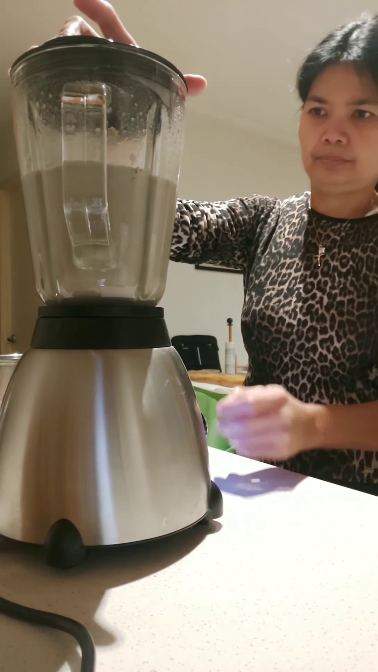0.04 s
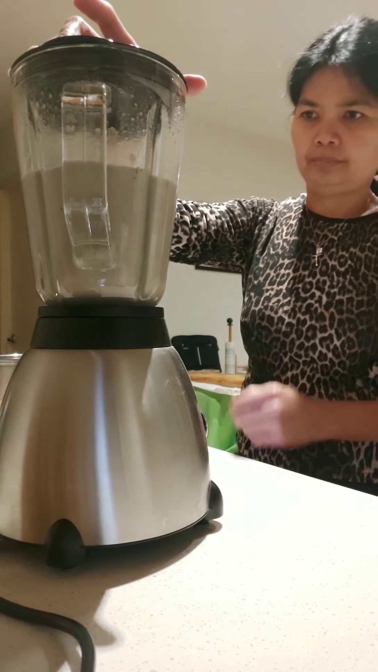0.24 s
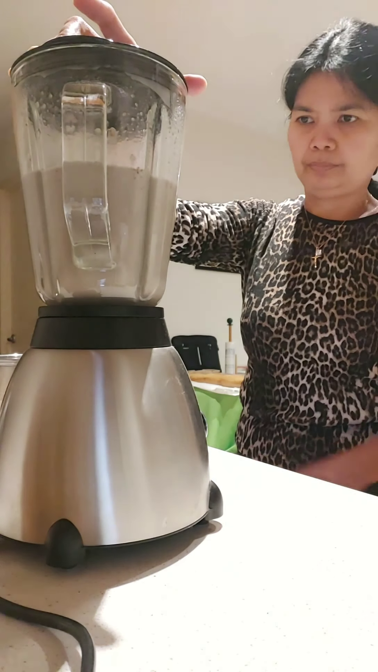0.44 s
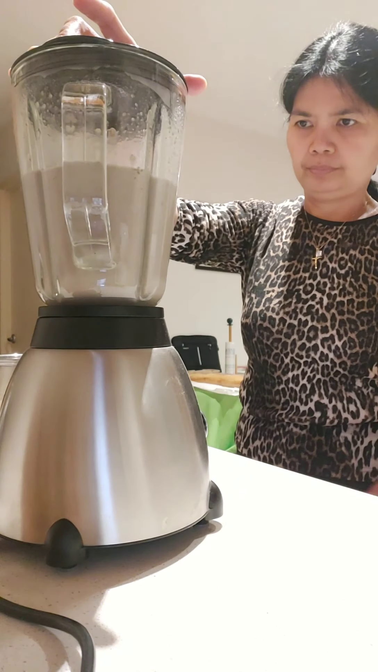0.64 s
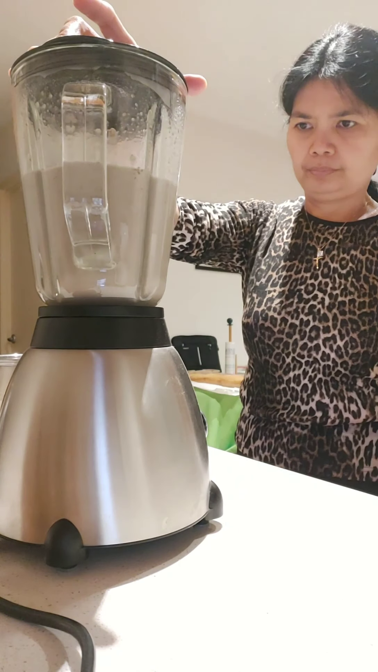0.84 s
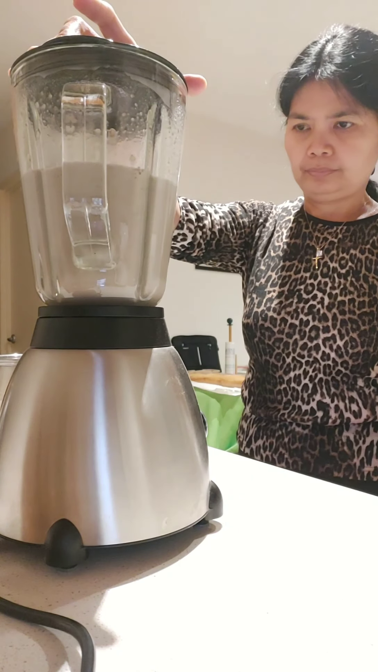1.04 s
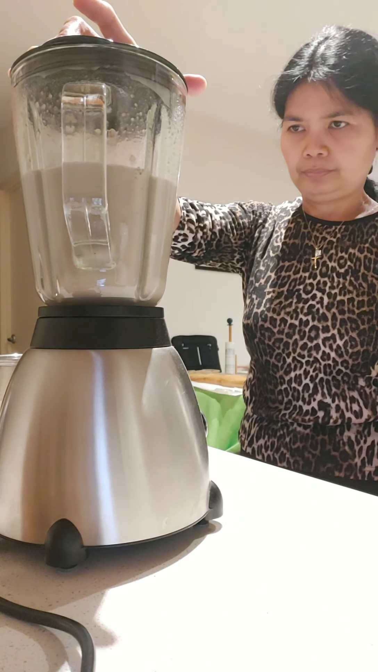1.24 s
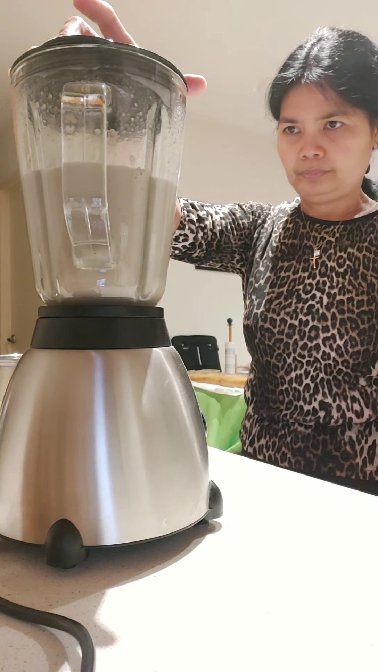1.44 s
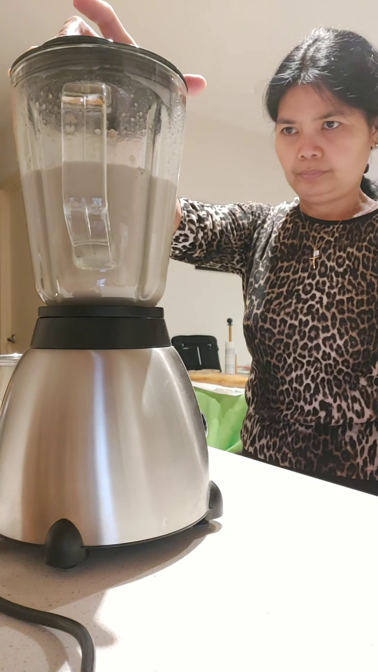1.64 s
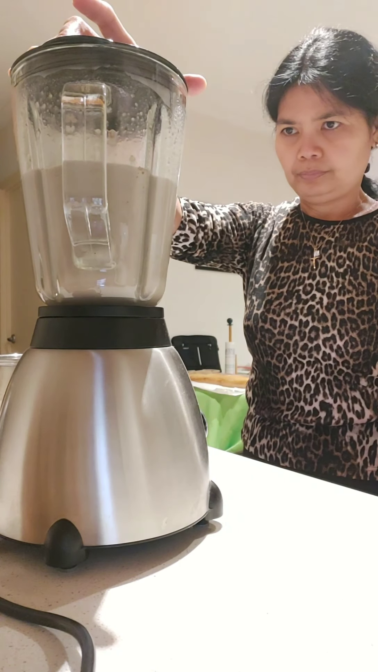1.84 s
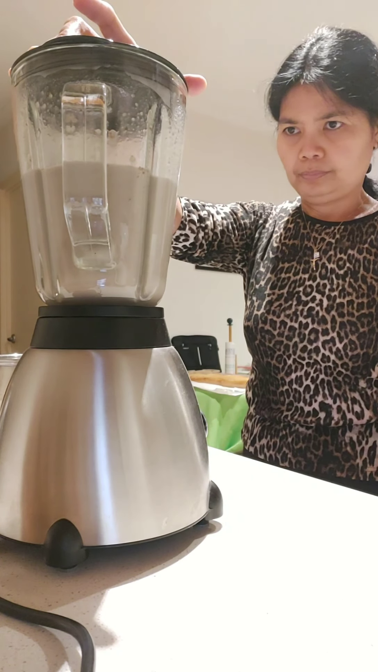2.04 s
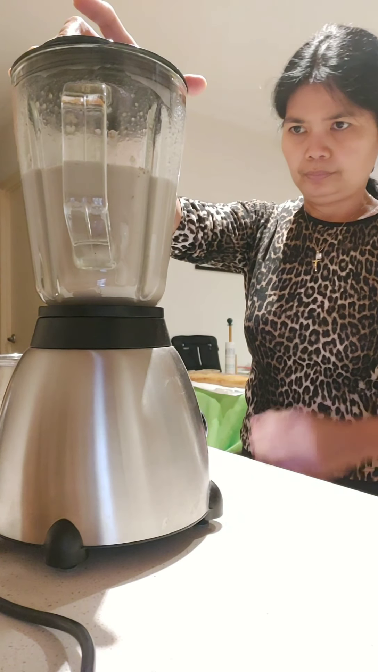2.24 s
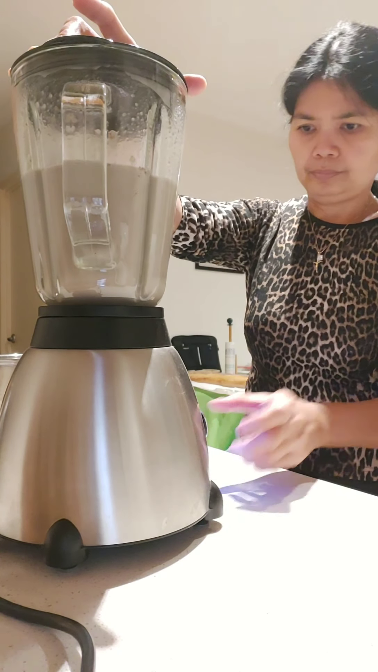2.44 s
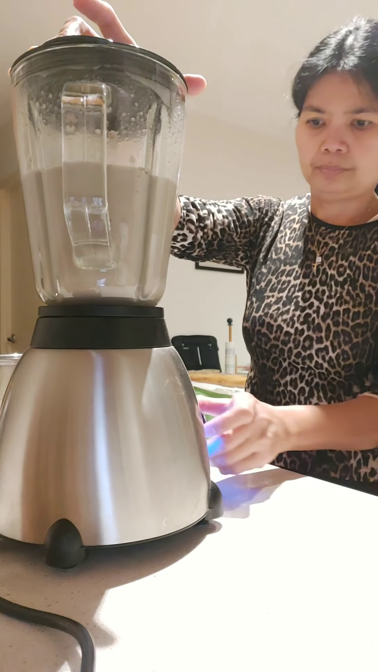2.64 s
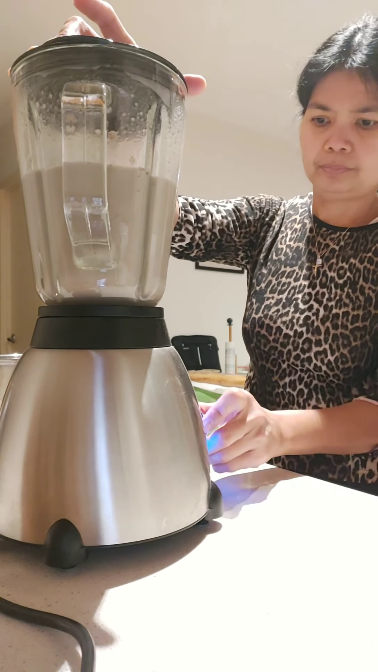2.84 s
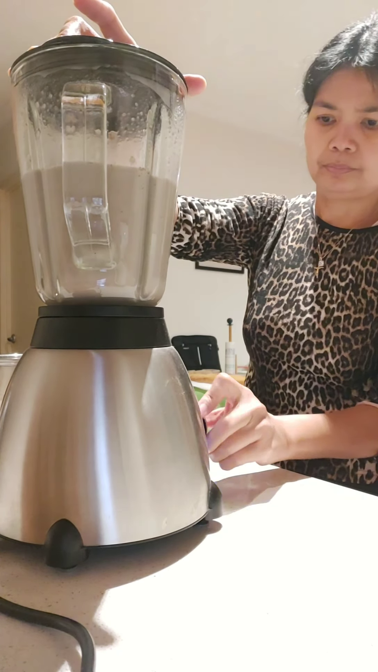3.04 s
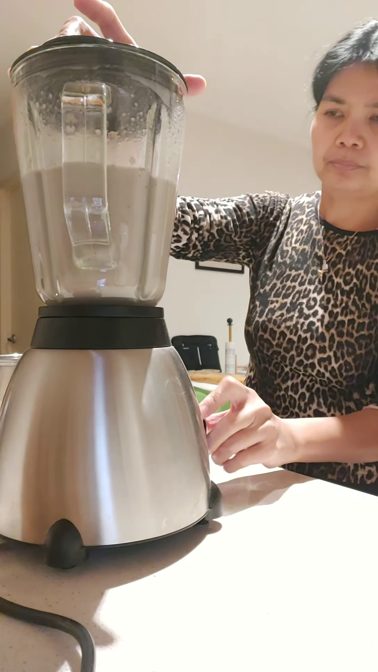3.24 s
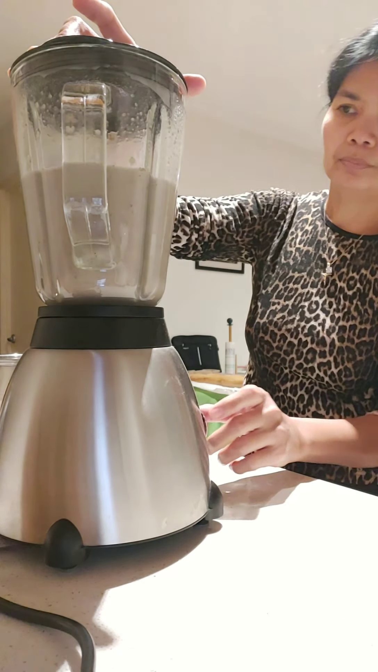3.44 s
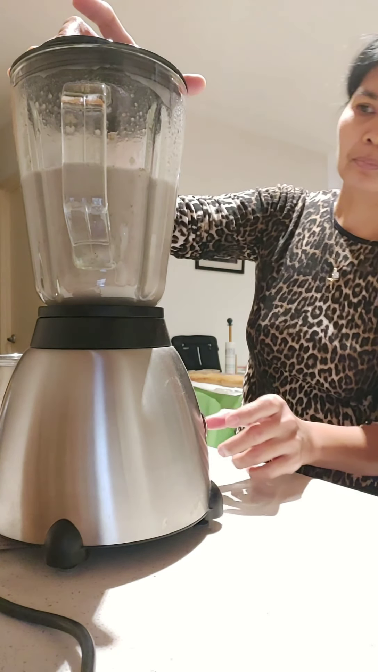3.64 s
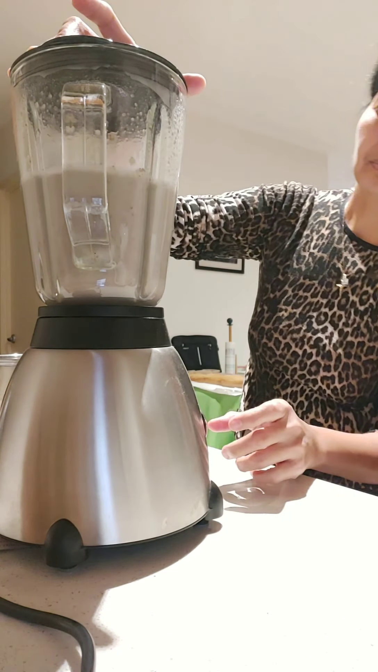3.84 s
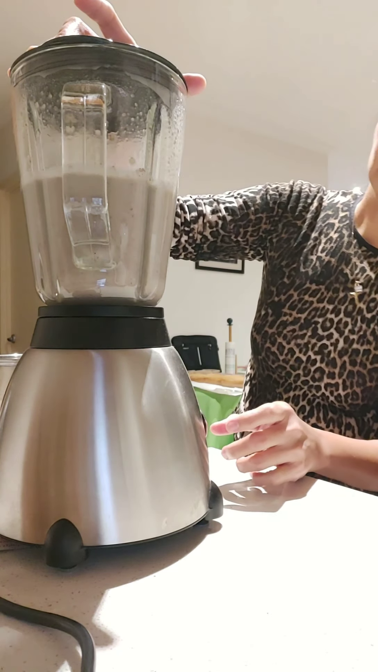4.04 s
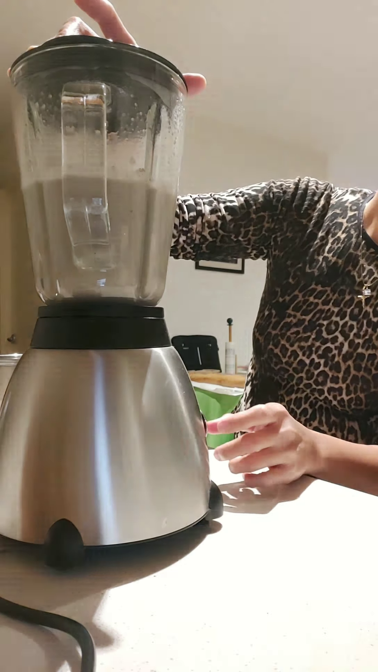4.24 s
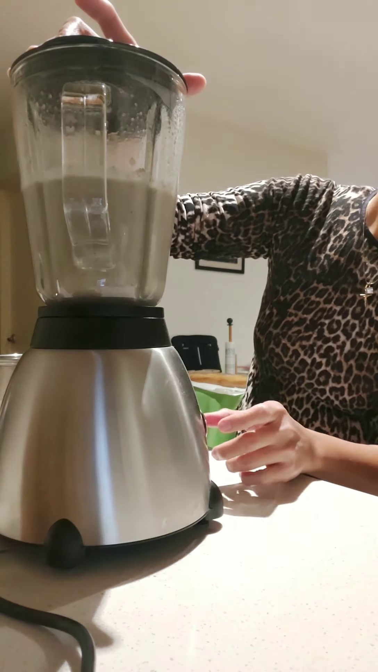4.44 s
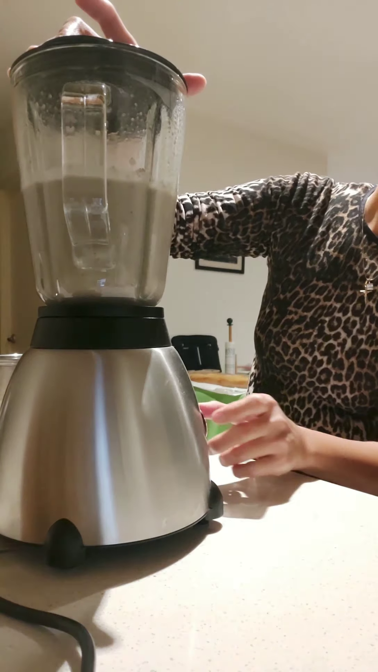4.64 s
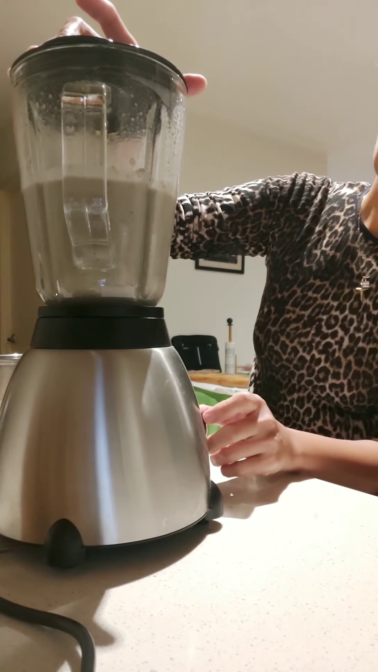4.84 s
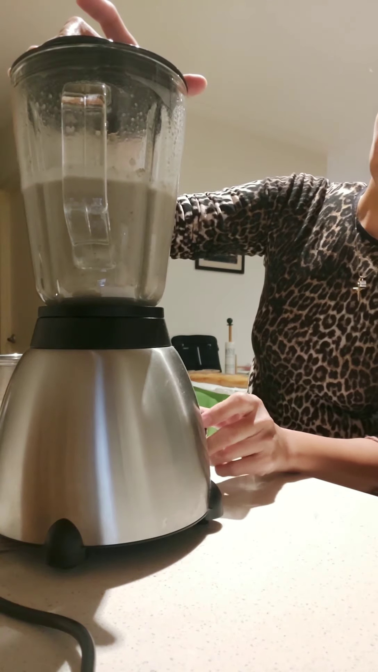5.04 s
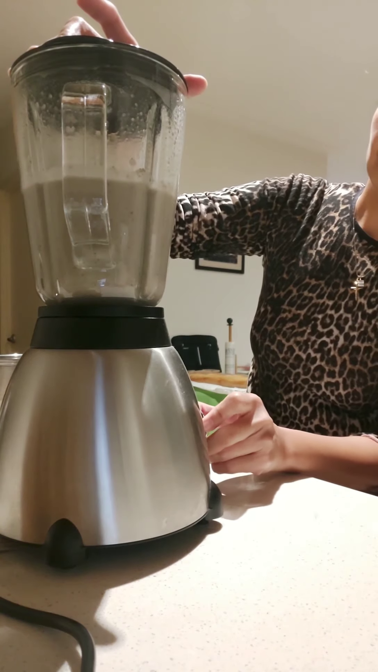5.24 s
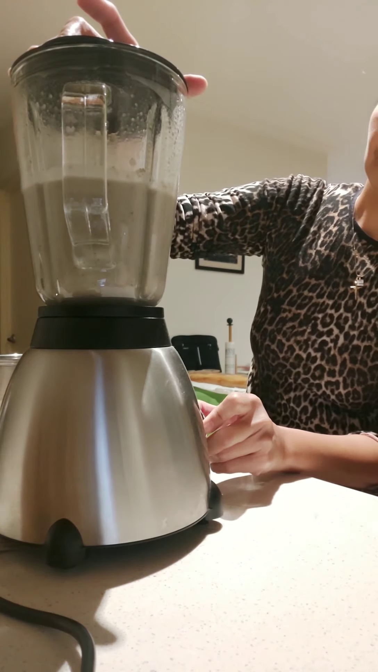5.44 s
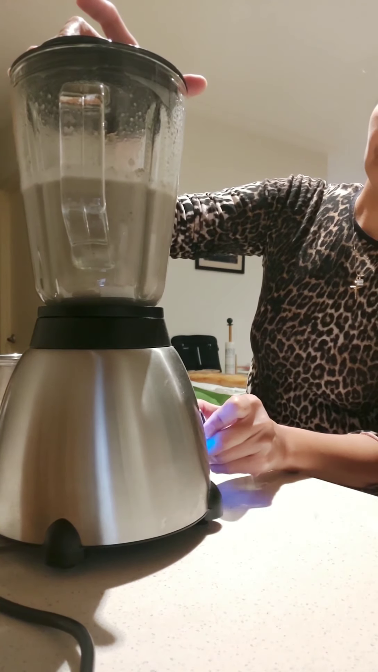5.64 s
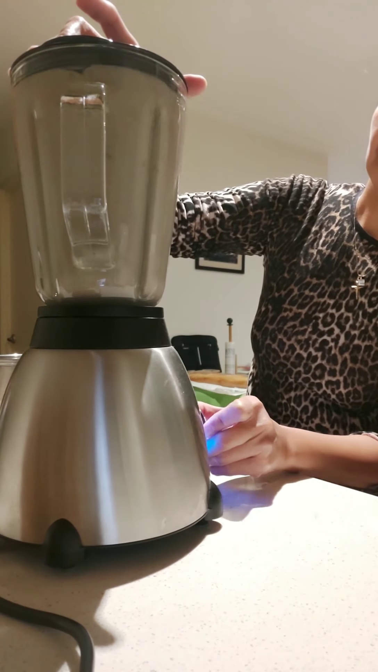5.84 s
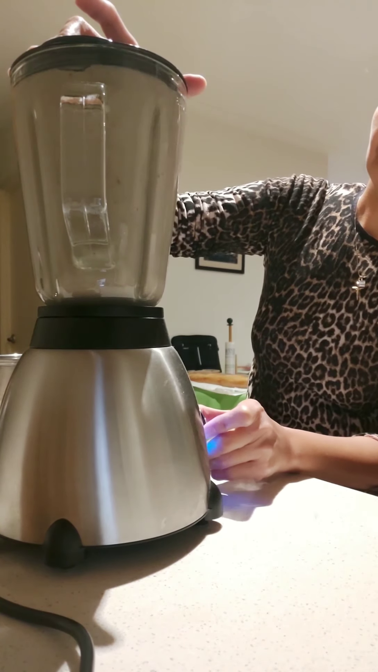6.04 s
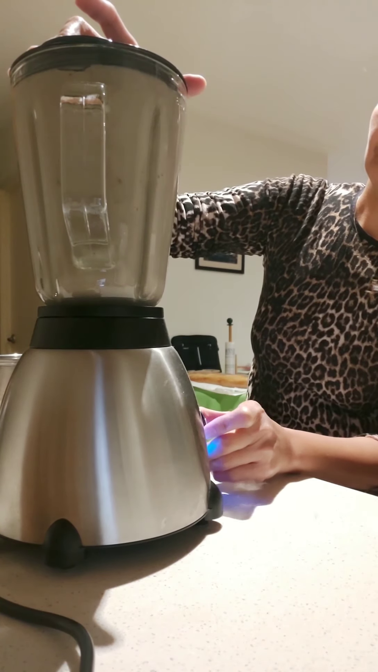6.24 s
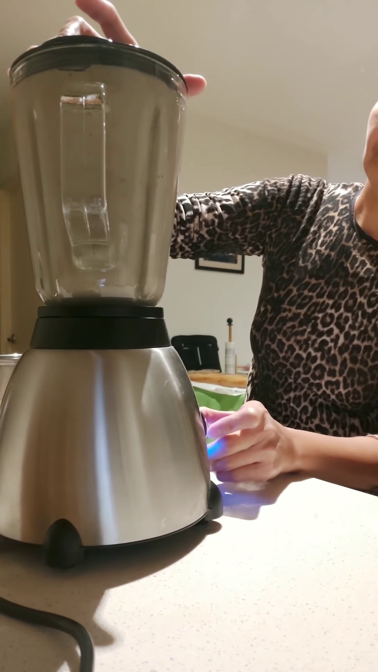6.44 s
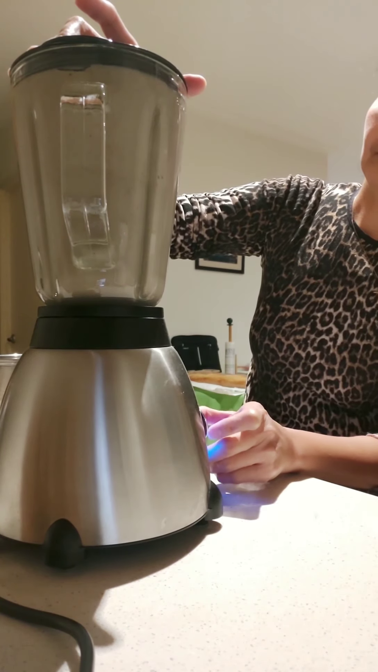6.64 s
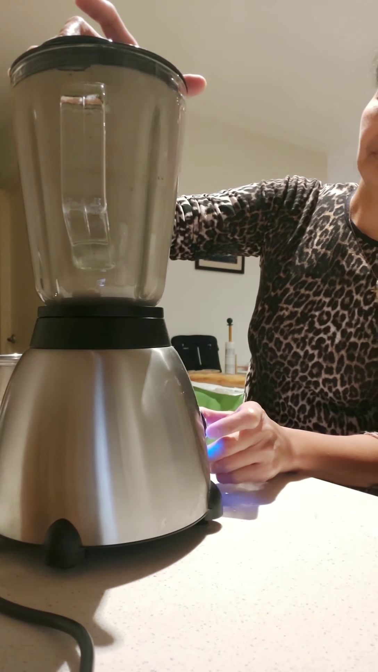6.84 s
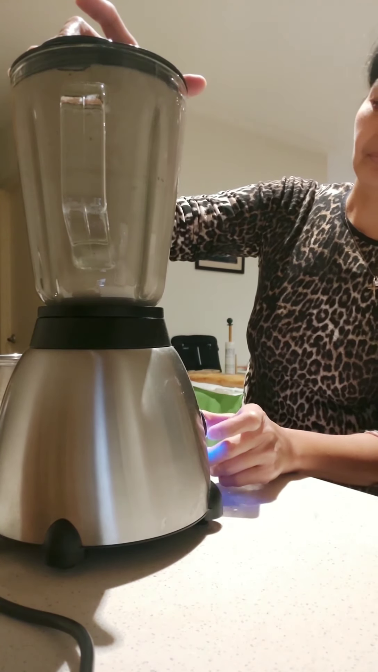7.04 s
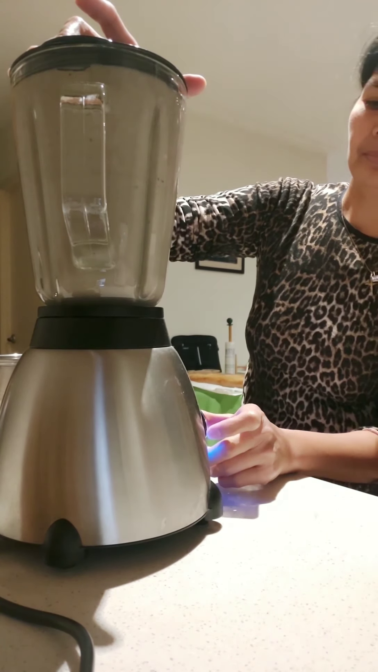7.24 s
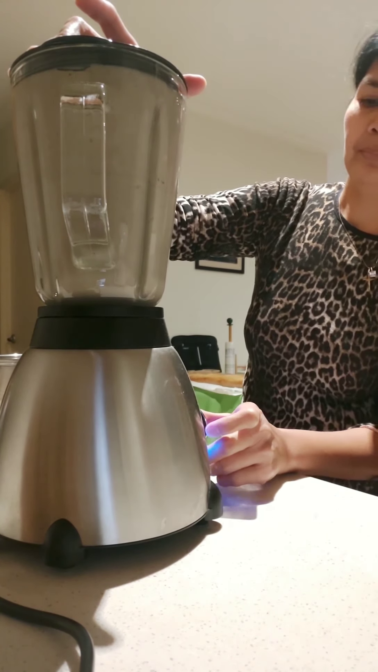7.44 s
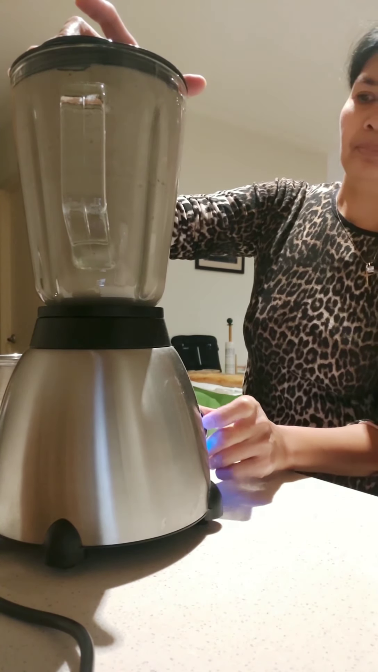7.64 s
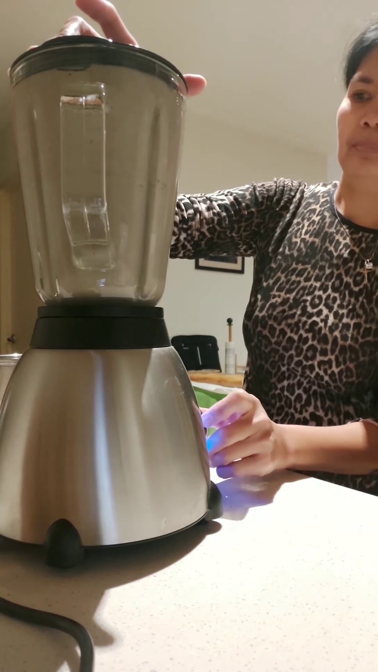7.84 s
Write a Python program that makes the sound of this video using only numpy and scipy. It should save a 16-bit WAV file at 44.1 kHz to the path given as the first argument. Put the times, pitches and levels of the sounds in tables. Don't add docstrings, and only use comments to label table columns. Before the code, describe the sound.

Close, harsh blender roar with a low motor hum coasts to a stop, leaves a faint electronic whine, then kicks in again and keeps running.

```python
import sys
import numpy as np
from scipy import signal
from scipy.fft import rfft, irfft, next_fast_len
from scipy.io import wavfile
from scipy.ndimage import uniform_filter1d

SR = 44100
rng = np.random.default_rng(int(sys.argv[2]) if len(sys.argv) > 2 else 0)


def magnitude_from_level(level_db):
    exponent = np.asarray(level_db, float) / 20
    return 10 ** exponent


def dump(signal):
    limited = np.clip(np.atleast_2d(signal).T, -1, 1)
    pcm = np.round(limited * 32767).astype(np.int16)
    wavfile.write(sys.argv[1], SR, pcm)


N = 348390

# (off [s], on [s])
SWITCH_S = (3.08, 5.594)
# (time [s], shaft speed [Hz], hum level [dB])
RESTART = [
    (5.61, 101.8, -27),
    (5.655, 105.5, -26),
    (5.69, 120.2, -12.5),
    (5.74, 137.7, -15.5),
    (5.804, 136.4, -25),
    (5.85, 138.5, -38),
    (6.2, 200, -68),
    (6.47, 219.3, -38),
    (7.9, 219.6, -40.5),
]
# (multiple of shaft speed [1], level [dB])
SHAFT_ORDERS = [(1, 0), (2, -31), (3, -34), (4, -34), (5, -31)]
# (shaft speed [Hz], level [dB])
MOUNT_HUM = [(20, -72), (63, -49), (86, -37), (102, -45), (110, -23), (150, -25.5), (172, -37.5),
             (218, -35.5)]
# (time [s], housing roar [dB])
RUN_EFFORTS = [
    [(0.0, -18.3), (1.9, -18), (2.2, -18.8), (3.12, -18), (3.34, -28.5), (3.51, -35.5), (3.59, -33.5),
     (3.7, -38.5), (3.78, -37.5), (4.03, -52), (4.06, -62)],
    [(5.59, -24), (5.71, -22), (5.82, -23), (5.92, -23), (5.94, -19.5), (6.3, -18.5), (7.9, -19)],
]
# (level re roar [dB], share of effort followed [1], gain while labouring [dB], share of splashes [1])
EFFORT_LAYERS = [
    (-0.16, 0.94, -0.4, .4),
    (-23, 0.3, 13, .1),
    (-10, .75, 9.5, .1),
    (-16, .95, 3.5, 0.98),
]
# (time [s], level [dB], half width [s])
JAR_SLAPS = [(.66, 3, .03), (1.21, 2, .03), (1.37, 1.5, .03), (1.65, -0.5, .03), (1.91, 2, .04),
             (3.11, 2, 0.015), (5.97, 6.5, .06), (6.38, 2.5, .03), (6.66, 0, 0.027), (6.78, 5, .03),
             (7.02, 0, .03), (7.28, 1, 0.035), (7.6, -2.5, .03)]
RESONANCE_HZ = [585, 690, 815, 1033, 1145, 1355, 1720, 1790, 2008, 2240, 2438, 2580, 2675, 2800, 3275, 3878,
                4200, 4500, 4780, 5010, 5235, 5370, 5570, 5850, 5945, 6090, 6850, 7560, 9110, 9345]
# (width [Hz], left [dB], right [dB])
RESONANCES = [(50, -7.5, -1), (60.4, -27.5, -7), (60, -9, -14.5), (55, -21.5, 4), (60.5, -16, 0),
              (45, -1, 2), (90, -12.5, 2), (70, -19.5, 3), (49.7, -13, 7.5), (70, 4.5, -15.5),
              (45.3, -2, 11), (90, 2, 6), (70, -1, 11), (70, -19.5, 0), (70, -19.5, -11), (50, -17, -7.5),
              (70, -1.5, -23), (60, -11, -8), (60, -5.5, -9), (70, -6.5, -4), (60, -9, -6.5), (60, -7.5, 3),
              (60, -8, 5.5), (60, -12, -0.5), (60, -10.5, -1), (55, -15.5, 1), (60, -22.5, -5),
              (80, -11.5, -15), (80, -20, -15), (80, -25, -11)]
# (frequency [Hz], left [dB], right [dB])
ROAR_FILL = [(500, -5.5, -13.5), (726, -13.5, -2.5), (1340, -9.5, -8), (1550, -13, 0), (1890, -9.5, -5.5),
             (2170, -13, 4.5), (2350, 2, -3.5), (2920, -7, 0.5), (2936, -18, -0.5), (3010, -9.5, -3),
             (4320, -13, -10), (5250, -8.5, -2.5), (6000, -16, -5), (7440, -13.5, -16.5)]
# (frequency [Hz], left [dB], right [dB])
HISS_FILL = [(6440, -20.5, -1), (7100, -18.5, -16.5), (7570, -15.5, -22), (8080, -21, -23),
             (9200, -24, -18.5), (11500, -22.5, -16.5), (13000, -24, -18.5), (14500, -26, -26),
             (15300, -27, -11.5), (15710, -27, -19.5), (16000, -50.5, -64)]
# (time [s], peak [dB], ring [Hz], T60 [s])
CRACKS = [
    (2.8394, -7.5, 4023, 0.0086),
    (3.8731, -25, 2300, 0.037),
    (3.9394, -38, 2510, .04),
    (3.9659, -29, 2280, .03),
    (4.0274, -47, 2600, .03),
    (5.09, -61, 1100, .14),
    (5.5937, -15.5, 5620, 0.045),
]
# (frequency [Hz], density [dB/Hz])
COUNTER_THRUM = [(15, -50), (28, -17), (46, -19), (60, -0.5), (82, -4), (112, 4), (132, -8), (150, -2.5),
                 (165, -9.5), (185, -11), (240, -19), (430, -100)]
# (frequency [Hz], density [dB/Hz])
BASE_BOOM = [(140, -28.5), (230, -9.5), (248, -10.5), (296, 2.5), (317, 7), (393, -9), (432, -1.5),
             (460, -8), (501, -2), (560, -22), (730, -42), (1230, -120)]
# (frequency [Hz], density [dB/Hz])
BASE_JUDDER = [(240, -14), (400, -1), (600, -8.5), (900, -7.5), (1040, -1.5), (1250, -19.5), (1700, -14.5),
               (2700, -21), (4000, -18.5), (6200, -38), (9000, -49), (15400, -110)]
# (frequency [Hz], density [dB/Hz])
LIQUID_SLUMP = [(290, -26), (500, -1), (1530, -3.5), (1670, -14), (1960, -31), (2390, -13), (4840, -13),
                (5830, -4), (8720, -18), (15500, -31)]
# (frequency [Hz], density [dB/Hz])
ROOM_RUMBLE = [(18, -45.5), (30, -19.5), (75, -9.5), (87, 2), (123, -6), (155, -3), (187, -17.5), (220, -7),
               (249, -11.5), (325, -3.5), (358, -14.5), (404, -15.5), (750, -42.5), (980, -62.5),
               (1650, -120)]
# (frequency [Hz], likeness [1])
ROOM_LIKENESS = [(60, 1), (240, 0.9), (950, 0.5), (3770, -0.05), (15000, -0.01)]
# (frequency [Hz], left less right [dB])
ROOM_TILT = [(60, -1), (180, -6.5), (550, -17.5), (1650, -4), (4970, -3.5), (15000, -4.5)]
# (frequency [Hz], density [dB/Hz])
KITCHEN_AIR = [(400, -29), (700, 0), (1400, -7.5), (3300, -13), (4200, -1.5), (5000, -14), (5800, -2.5),
               (7200, -21.5), (12500, -18.5), (15800, -15.5), (16500, -60.5)]
# (mains steps from lamp tone [1], level [dB])
LAMP_LINES = [(-2, -11), (-1, -4), (0, 0), (1, -11), (3, -2), (4, 0), (5, -9)]
# (at first [dB], gain recovered [dB])
BACKGROUND = [
    (-68, 5.5),
    (-86, 9.5),
    (-85, 5.5),
]
# (time [s], frequency [Hz], level [dB], T60 [s])
FAR_CLINK = (4.663, 1710, -67, .6)

T_S = np.arange(N) / SR
HZ = np.fft.rfftfreq(8192, 1 / SR)
MAINS_HZ = 50


def evened(x):
    return x / np.sqrt(np.mean(x ** 2) + 1e-30)


def read(points, hz):
    f, *columns = np.transpose(points)
    return np.array([np.interp(np.log(hz + 1), np.log(f + 1), c) for c in columns])


def along(rows):
    s, *columns = np.transpose(rows)
    return np.array([np.interp(T_S, s, c) for c in columns])


def stroke(start_s, rise_s, hold_s, fall_s):
    u = T_S - start_s
    return np.clip(u / rise_s, 0, 1) * np.exp(-np.maximum(u - hold_s, 0) / fall_s)


def spell(rows, rise_s, fall_s):
    opening = np.clip((T_S - rows[0][0]) / rise_s + (rows[0][0] == 0), 0, 1)
    return opening * np.clip((rows[-1][0] + fall_s - T_S) / fall_s, 0, 1)


def wander(top_hz):
    step = 16
    coarse = next_fast_len(N // step + 2)
    hz = np.fft.rfftfreq(coarse, step / SR)
    lowpass = (hz > 1) / (1 + (hz / top_hz) ** 2)
    slow = irfft(rfft(rng.standard_normal(coarse)) * lowpass, coarse)
    return np.interp(np.arange(N) / step, np.arange(coarse), evened(slow))


def colour(x, gain):
    cepstrum = irfft(np.log(gain + 1e-6))
    cepstrum[..., 1:4096] *= 2
    cepstrum[..., 4097:] = 0
    return signal.oaconvolve(x, irfft(np.exp(rfft(cepstrum))), axes=-1)[..., :N]


def band(hz, lo_hz, hi_hz):
    return 1 / np.sqrt((1 + (lo_hz / (hz + 1)) ** 30) * (1 + (hz / hi_hz) ** 30))


def late(x):
    return np.array([x[0], np.roll(x[1], 21)])


def speed():
    run_hz, friction_hz_per_s, drag_per_hz_s = 218, 95, .0075
    knee_hz = np.sqrt(friction_hz_per_s / drag_per_hz_s)
    pace_rad_per_s = np.sqrt(friction_hz_per_s * drag_per_hz_s)
    angle_rad = np.arctan(run_hz / knee_hz) - pace_rad_per_s * np.maximum(T_S - SWITCH_S[0], 0)
    coast_hz = np.maximum(knee_hz * np.tan(np.maximum(angle_rad, 0)), 8)
    coast_db = read(MOUNT_HUM, coast_hz)[0] - 40 * (coast_hz < 10)
    hz, db = np.where(T_S < SWITCH_S[1], [coast_hz, coast_db], along(RESTART))
    return hz, db + 1.5 * wander(10)


def shaft():
    hz, db = speed()
    turns = np.cumsum(hz * (1 + .006 * wander(6))) / SR
    hum = np.sin(2 * np.pi * turns)
    for k, order_db in SHAFT_ORDERS[1:]:
        boom_db = 12 / (1 + ((k * hz - 315) / 70) ** 2)
        gain = magnitude_from_level(order_db + boom_db + 2.5 * wander(15))
        hum = hum + gain * np.sin(2 * np.pi * k * turns + k * k)
    return np.sqrt(2) * magnitude_from_level(db) * hum * magnitude_from_level(np.array([[-4.], [3.]])), turns, hz


def efforts():
    full_db = -18.5
    out = np.zeros((4, N))
    level_db, follows, labour_db, wet = np.transpose(EFFORT_LAYERS)[:, :, None]
    splash_db = sum(db * np.exp(-((T_S - s) / width_s) ** 2) for s, db, width_s in JAR_SLAPS)
    labour = stroke(5.63, rise_s=.07, hold_s=.17, fall_s=.04)
    for rows in RUN_EFFORTS:
        db = full_db + level_db + follows * (along(rows) - full_db)
        db = db + labour_db * labour + wet * splash_db
        powered = rows[0][0] == 0 or T_S > SWITCH_S[1]
        out += spell(rows, .002, 0.22) * powered * magnitude_from_level(db)
    out[1] *= magnitude_from_level(7 * stroke(5.63, rise_s=0.081, hold_s=0.18, fall_s=0.87))
    out[2] *= magnitude_from_level(21 * stroke(5.606, rise_s=0.0032, hold_s=0.0076, fall_s=.02))
    return out


def churn(gain, valleys, lo_hz, hi_hz, turns, hz_now, slosh_db, grit_db, beat, ring_same, fill_same):
    f, (width_hz, *tops_db) = np.c_[RESONANCE_HZ], np.transpose(RESONANCES)[:, :, None]
    bell = 1 / (1 + (2 * (HZ - f) / width_hz) ** 2) ** 2
    power = np.array([(magnitude_from_level(db) ** 2 * bell).sum(0) for db in tops_db])
    edges = band(HZ, lo_hz, hi_hz)
    rings = np.sqrt(power) * edges
    fill = magnitude_from_level(read(valleys, HZ)) * edges
    scale = np.sqrt(np.mean(rings ** 2 + fill ** 2) / 2)
    depth = np.clip(beat * (1 + 150 / hz_now), 0, .3)
    force = gain * magnitude_from_level(slosh_db * wander(31) + grit_db * wander(400))
    force = force * (1 + depth * np.cos(2 * np.pi * turns))
    struck = np.clip(hz_now / 200, .1, 1) ** 0.64 * magnitude_from_level(0.69 * wander(7.8))
    struck = struck * (1 - 0.29 * stroke(SWITCH_S[1], rise_s=.001, hold_s=0.31, fall_s=.02))
    out = 0
    for shape, same, share in ((rings, ring_same, struck), (fill, fill_same, 1)):
        shared, *own = rng.standard_normal((3, N))
        grain = same * shared + np.sqrt(1 - same ** 2) * np.array(own)
        out = out + colour(share * force * grain, shape)
    return late(out) / scale


def knocks():
    out, t = np.zeros(N), np.arange(2000) / SR
    for s, db, ring_hz, t60_s in CRACKS:
        ring = signal.butter(2, [ring_hz / 1.4, ring_hz * 1.3], "band", fs=SR)
        crack = signal.lfilter(*ring, rng.standard_normal(2000))
        out[round(s * SR):][:2000] += magnitude_from_level(db + 4.0 - 60 * t / t60_s) * crack
    return late(out * magnitude_from_level(np.array([[-3.], [3.]])))


def base(gain, spectrum, same, tilt_db, lumpy_db):
    a, b = rng.standard_normal((2, N))
    shape = magnitude_from_level(read(spectrum, HZ)[0])
    pair = np.array([a, same * a + np.sqrt(1 - same ** 2) * b])
    drive = pair * gain * magnitude_from_level(lumpy_db * wander(13))
    return colour(drive, shape[None] / np.sqrt(np.mean(shape ** 2))) * magnitude_from_level(np.array([[tilt_db], [-tilt_db]]))


def judder(turns):
    jolts = .5 + np.exp(-(turns % 1) / .3)
    bite = magnitude_from_level(-18.5 - 5 * stroke(5.6, rise_s=.001, hold_s=0.06, fall_s=0.017))
    swell = stroke(5.6, rise_s=.0055, hold_s=0.18, fall_s=0.061)
    return base(swell * bite * jolts, BASE_JUDDER, .6, -0.65, 0.76)


def coils():
    powered = uniform_filter1d(1. * ((T_S < SWITCH_S[0]) | (T_S > SWITCH_S[1])), size=400)
    return powered * magnitude_from_level(-48 + 5.8 * wander(9.4)) * np.sin(2 * np.pi * 3 * MAINS_HZ * T_S)


def settle():
    fall_db_per_s = -115
    fall_s = -20 / np.log(10) / fall_db_per_s
    gain = magnitude_from_level(-50.5) * stroke(3.96, rise_s=.03, hold_s=.02, fall_s=fall_s)
    return base(gain, LIQUID_SLUMP, .2, -2, 1.2)


def rumble(level_db):
    a, b, c = rng.standard_normal((3, N))
    tilt_db = read(ROOM_TILT, HZ)[0] / 2
    same = np.clip(read(ROOM_LIKENESS, HZ)[0], 0, 1)
    shape = magnitude_from_level(read(ROOM_RUMBLE, HZ)[0] + np.array([tilt_db, -tilt_db]))
    tone = colour(a[None], shape * np.sqrt(same)) + colour(np.array([b, c]), shape * np.sqrt(1 - same))
    return tone * magnitude_from_level(level_db) / np.std(tone.mean(0))


def lamp(level_db):
    lines = ((4048 + MAINS_HZ * k, db) for k, db in LAMP_LINES)
    return magnitude_from_level(level_db) * sum(magnitude_from_level(db) * np.sin(2 * np.pi * (hz * T_S + rng.random())) for hz, db in lines)


def clink():
    s, hz, db, t60_s = FAR_CLINK
    u = np.maximum(T_S - s, 0)
    pair = np.sin(2 * np.pi * hz * u) + .6 * np.sin(2 * np.pi * (hz + 42) * u)
    held = np.clip(u / .006, 0, 1) * np.clip((.11 - u) / .02, .25, 1)
    return magnitude_from_level(db - 60 * u / t60_s) * pair * held


def kitchen():
    wake_s, wake_length_s = 4.26, 0.87
    awake = np.clip((T_S - wake_s) / wake_length_s, 0, 1)
    rumble_db, air_db, lamp_db = (first_db + gain_db * awake for first_db, gain_db in BACKGROUND)
    air = base(magnitude_from_level(air_db), KITCHEN_AIR, .05, -2, 1.5)
    return rumble(rumble_db) + air + lamp(lamp_db) + clink()


def scene():
    hum, turns, hz_now = shaft()
    roar, thrum, boom, hiss = efforts()
    mid = churn(roar, ROAR_FILL, 520, 6800, turns, hz_now, slosh_db=0.9, grit_db=0.5, beat=.06,
                ring_same=0.88, fill_same=0.58)
    top = churn(hiss, HISS_FILL, 6900, 15800, turns, hz_now, slosh_db=.9, grit_db=1.5, beat=.06,
                ring_same=.8, fill_same=.5)
    low = base(thrum * magnitude_from_level(4.0), COUNTER_THRUM, 0.98, -0.796, 1.5)
    low = low + base(boom, BASE_BOOM, 0.96, -2.5, 1.1) + judder(turns)
    return hum + mid + top + knocks() + low + coils() + settle() + kitchen()


def top_cut(x):
    return signal.sosfilt(signal.butter(12, 16440, fs=SR, output="sos"), x)


def record(dry):
    edge = signal.firwin(511, 15850, window=("kaiser", 9), fs=SR)
    mix = signal.oaconvolve(np.clip(dry, -1, 1), edge[None], "same")
    return top_cut(mix)


dry = scene()
out = record(dry)
dump(out)
```